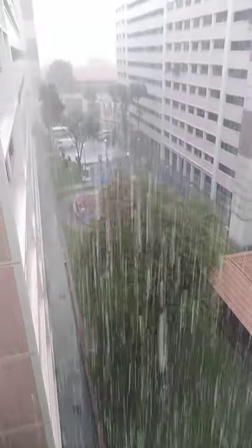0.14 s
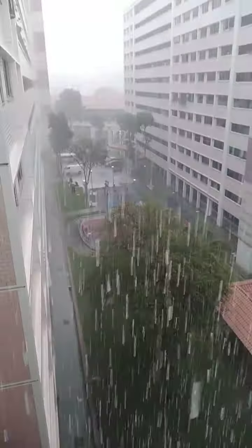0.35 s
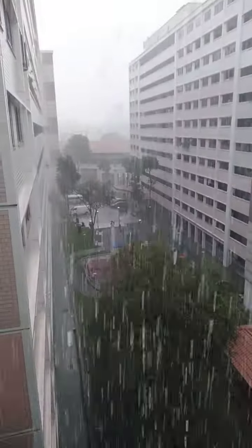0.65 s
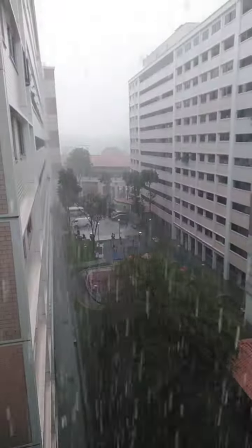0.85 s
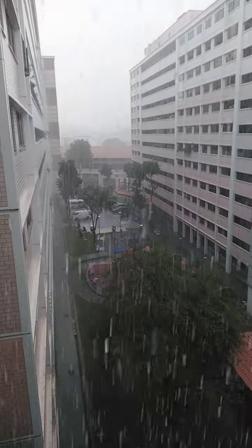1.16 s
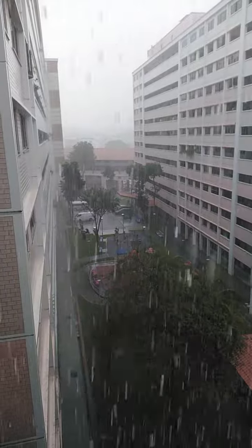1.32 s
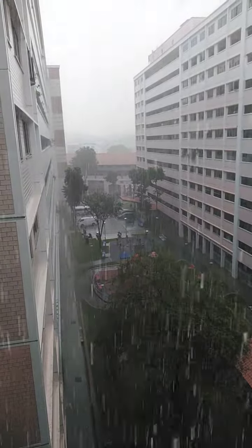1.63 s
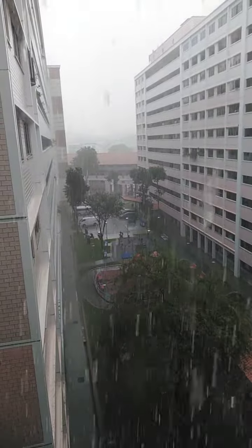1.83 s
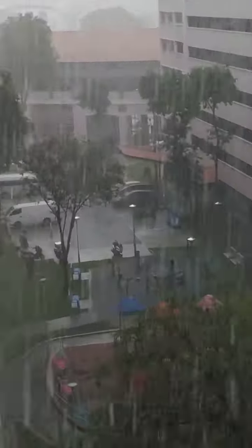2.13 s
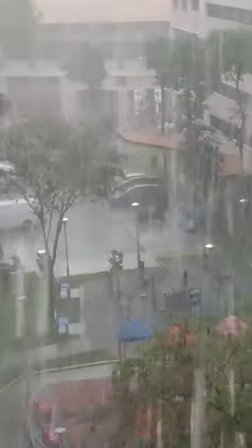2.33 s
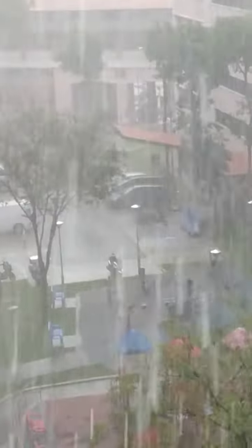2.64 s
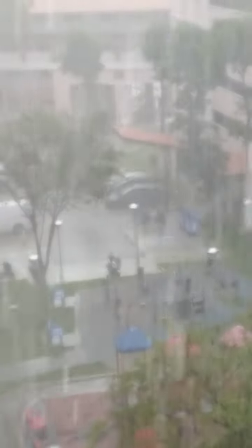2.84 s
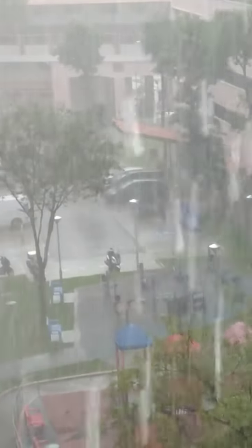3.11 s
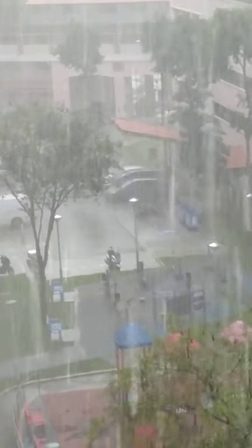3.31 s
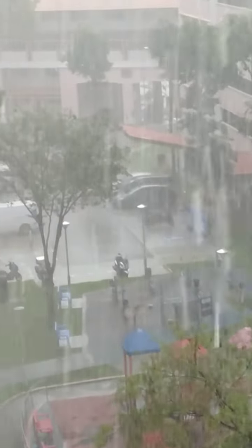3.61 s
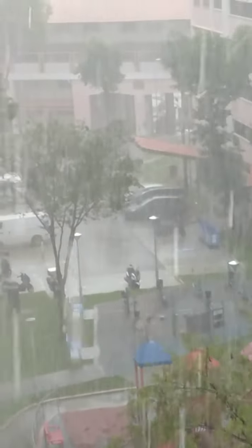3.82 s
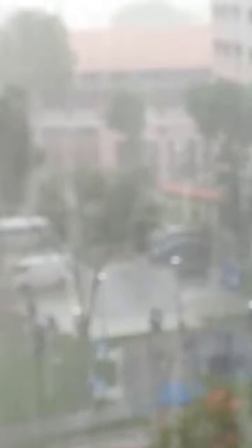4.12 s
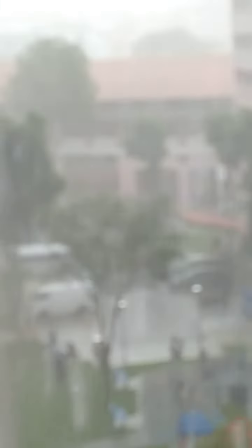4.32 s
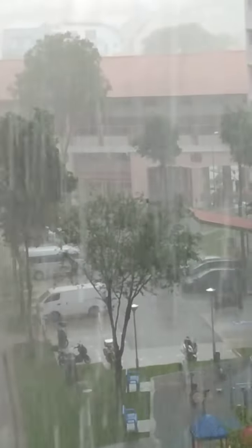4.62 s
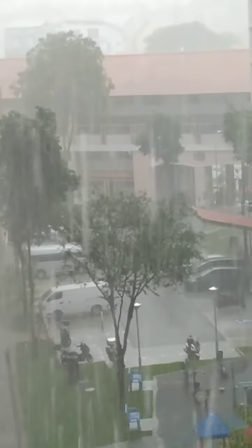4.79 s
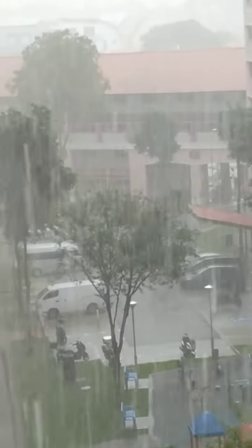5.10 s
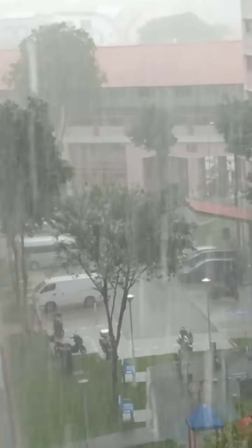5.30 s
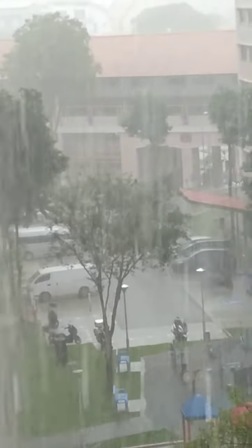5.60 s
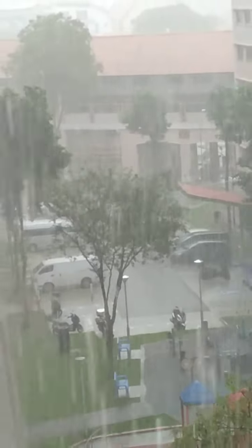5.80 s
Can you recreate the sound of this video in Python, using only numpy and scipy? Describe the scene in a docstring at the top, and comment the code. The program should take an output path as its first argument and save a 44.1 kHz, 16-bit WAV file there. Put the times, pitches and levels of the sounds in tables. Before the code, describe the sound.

A steady, sizzling downpour with close drop splashes and dull pops, increasingly buffeted by lumpy low wind rumble that overloads the microphone.

```python
"""Heavy rain heard from a high window through two small microphone ports, its hiss strongest near 7-8 kHz.
From the start drop ticks make the hiss and ring the wet ledge, and a faint 2.7 kHz whistle of resonant noise
soon dies away. Big drops splash nearby as short noise bursts, joined after a second by dull pops at the left.
All the while a rising wind buffets each port on its own as lumpy low noise with a brighter flutter.
A quick gain control ducks the rain under strong buffets, and the loudest peaks clip."""
import sys
import numpy as np
from scipy import signal
from scipy.fft import rfft, irfft
from scipy.io import wavfile
from scipy.ndimage import uniform_filter1d

SR = 44100
rng = np.random.default_rng(int(sys.argv[2]) if len(sys.argv) > 2 else 0)


def dump(signal):
    """Clip the signal to [-1, 1] and save it as 16-bit WAV at the path in sys.argv[1]."""
    limited = np.clip(np.atleast_2d(signal).T, -1, 1)
    pcm = np.round(limited * 32767).astype(np.int16)
    wavfile.write(sys.argv[1], SR, pcm)


N = 262395
T = np.arange(N) / SR
LAG = 19  # samples by which sound from below reaches the left port later
HALF_LEAN = np.array([[0.5], [-0.5]])  # shares a left-over-right difference in dB between the ports


def gain_of(db):
    """dB to a factor."""
    return 10 ** (np.asarray(db) / 20)


def evened(x):
    """Each channel at rms 1."""
    return x / np.sqrt(np.mean(x ** 2, -1, keepdims=True))


def curves(rows):
    """Columns of a time table, one value a sample."""
    s, *columns = np.transpose(rows)
    return np.array([np.interp(T, s, c) for c in columns])


def over_hz(rows):
    """Columns of a spectrum table, one value a frequency bin, read along log frequency."""
    hz, *columns = np.transpose(rows)
    bins = np.log(np.fft.rfftfreq(N, 1 / SR) + 1)
    return np.array([np.interp(bins, np.log(hz), c) for c in columns])


def coloured(x, rows):
    """Each channel through its own spectrum, at rms 1."""
    return evened(irfft(rfft(x) * gain_of(over_hz(rows)), N))


def wander(hz, channels):
    """Smooth chance motion at rms 1, between hz / 4 and hz."""
    slow = signal.butter(2, [hz / 4, hz], "bandpass", fs=SR, output="sos")
    return evened(signal.sosfilt(slow, rng.standard_normal((channels, N))))


def patter(per_s, spread_db, wash):
    """Drop ticks of uneven size over the smooth wash of far rain; the shared part reaches the left port later."""
    # How alike the rain is at the two ports. Each row: frequency in Hz, likeness from 0 to 1.
    likeness = [(300, 0.36), (1000, 0), (2200, 0.29), (3000, 0), (4000, 0.047), (8000, 0.039)]
    falls = rng.random((2, N)) < per_s / SR
    size = gain_of(spread_db * np.minimum(rng.exponential(1, (2, N)), 5))
    ticks = evened(size * falls * rng.choice([-1., 1.], (2, N)))
    right, other = evened(ticks + wash * rng.standard_normal((2, N)))
    same = np.clip(over_hz(likeness)[0], 0, 1)
    shared = same * rfft(np.roll(right, LAG))
    left = shared + np.sqrt(1 - same ** 2) * rfft(other)
    return np.array([irfft(left, N), right])


def patchy(x):
    """The hiss thins out unevenly in small random patches of time and pitch."""
    # Unevenness of the hiss. Each row: frequency in Hz, depth of the patches in dB.
    depths = [(800, 3), (2200, 4.5), (3500, 15), (4800, 7), (7500, 1.5), (10000, 4.5), (12000, 10.5)]
    hz, _, z = signal.stft(x, SR, nperseg=1024, noverlap=768)
    patches = uniform_filter1d(rng.standard_normal(z.shape[1:]), size=2, axis=0)
    patches = uniform_filter1d(patches, size=7, axis=1)
    # patches thin the hiss more than they swell it
    patches = np.minimum(patches / patches.std(), 0.6)
    depth_db = np.interp(hz, *np.transpose(depths))[:, None]
    _, uneven = signal.istft(z * gain_of(depth_db * patches), nperseg=1024, noverlap=768)
    return evened(uneven[:, :N])


def ledge_ring(level_db):
    """Drops on the wet ledge ring it in a few broad modes, at a level that wanders."""
    # Modes of the ledge. Each row: centre in Hz, width at half amplitude in Hz,
    # left and right peak in dB relative to each other.
    ledge = [(926, 1700, -12, -8.5), (2230, 460, -6, -12)]
    hz = np.fft.rfftfreq(N, 1 / SR)
    modes = sum(gain_of([[left_db], [right_db]]) / (1 + 2j * (hz - centre) / width) ** 2
                for centre, width, left_db, right_db in ledge)
    ring = irfft(rfft(patter(per_s=900., spread_db=2.2, wash=0.26)) * modes, N)
    return ring / ring[0].std() * gain_of(level_db + 3.9 * wander(7.6, channels=1))


def rain():
    """The downpour: a patchy hiss of many drops coloured by the ports, and the ring of the ledge."""
    # Course of the downpour. Each row: time in seconds, mean level of the ledge ring at the left port in dB,
    # hiss left over right in dB.
    downpour = [(0, -34.5, 1), (1, -37.5, 3), (2.2, -41, 3.5), (3, -41, 4), (4.5, -34, 4), (5.95, -39, 4)]
    # Colour of the hiss through each port, with the port resonance on top.
    # Each row: frequency in Hz, left and right density in relative dB per Hz.
    hiss_colour = [(200, -29, -22), (686, -10.5, -7), (980, -17.5, -15), (1670, -14, -14.5),
                   (2370, -12, -9), (2670, -14, -10), (3120, -16.5, -12.5), (3670, -17, -14),
                   (4160, -11.5, -9), (6080, -6, -1.5), (6540, -3.5, 1), (7170, -1, 7), (7600, 3, 1),
                   (8350, 2.5, 0), (9090, -2, -6), (10570, -13, -8), (11150, -16, -13.5),
                   (14000, -20.5, -20.5)]
    ring_db, lean_db = curves(downpour)
    drops = patter(per_s=3500., spread_db=4.1, wash=1.3)
    hiss = coloured(patchy(drops), hiss_colour) * gain_of(-9 + HALF_LEAN * lean_db)
    return hiss + ledge_ring(ring_db)


def puffs():
    """Strength in dB of the single buffets at each port: a smooth bump for each."""
    # Single buffets, weak and strong, at set times. Each row: time in seconds, port (0 left, 1 right),
    # strength in dB before the wind scales it.
    set_puffs = [(0.126, 0, 5), (0.193, 1, 27), (0.432, 0, 17), (0.522, 1, 12), (0.574, 0, 19),
                 (0.645, 1, 20), (0.816, 0, 20), (0.926, 0, 28), (0.995, 0, 19), (1.021, 1, 17),
                 (1.085, 1, 21), (1.126, 0, 14), (1.141, 1, 19), (1.213, 1, 14), (1.22, 0, 14),
                 (1.311, 1, 16), (1.403, 1, 13), (1.517, 1, 7), (1.531, 0, 12), (1.599, 1, 10),
                 (1.62, 0, 9), (1.725, 1, 2), (1.796, 1, 22), (1.854, 1, 13), (1.91, 1, 7), (1.915, 0, 10),
                 (1.971, 1, 6), (2.07, 1, 17), (2.174, 1, 24), (2.255, 1, 9), (2.293, 1, 24),
                 (2.331, 0, 18), (2.342, 1, 23), (2.382, 0, 11), (2.475, 1, 12), (2.529, 1, 5),
                 (2.616, 1, 15), (2.652, 1, 19), (2.689, 1, 15), (2.726, 1, 21), (2.807, 1, 16),
                 (2.872, 1, 15), (2.945, 1, 10), (2.961, 0, 24), (3., 1, 6), (3.019, 0, 5), (3.06, 0, 11),
                 (3.105, 1, 27), (3.128, 0, 15), (3.298, 1, 11), (3.36, 0, 14), (3.394, 1, 5),
                 (3.439, 0, 11), (3.5, 1, 6), (3.58, 1, 18), (3.654, 1, 18), (3.71, 1, 7), (3.73, 0, 5),
                 (3.762, 1, 19), (3.797, 1, 15), (3.87, 1, 13), (3.962, 0, 8), (4.02, 1, 12),
                 (4.044, 1, 11), (4.244, 1, 12), (4.264, 0, 2), (4.324, 1, 9), (4.426, 0, 2),
                 (4.498, 1, 12), (4.67, 1, 14), (4.737, 1, 7), (4.807, 1, 21), (4.842, 0, 1), (4.86, 1, 18),
                 (4.9, 1, 18), (4.987, 1, 13), (5.1, 1, 16), (5.141, 1, 20), (5.22, 0, 5), (5.37, 1, 5),
                 (5.392, 0, 5), (5.428, 1, 8), (5.473, 1, 15), (5.481, 0, 4), (5.504, 1, 21),
                 (5.559, 1, 10)]
    puff_s = 0.0069  # time from the top of a bump down to 1/e
    per_s = np.array([[2.8], [1.7]])  # further buffets that come by chance: left, right
    peak_db = rng.uniform(5.64, 14.4, (2, N)) * (rng.random((2, N)) < per_s / SR)
    for s, port, db in set_puffs:
        peak_db[round(port), round(s * SR)] += db
    bump = np.exp(-(np.arange(-2600, 2601) / SR / puff_s) ** 2)
    return signal.oaconvolve(peak_db, bump[None], "same")


def wind():
    """Lumpy pressure, unrelated at the two ports; stronger gusts shed more small eddies and sound brighter."""
    # Wind level at each port. Each row: time in seconds, left level in dB, right level in dB.
    gusts = [(0, -19, -17.5), (.4, -14, -17), (.75, -15.5, -12), (1, -13.5, -13), (1.15, -9.5, -12),
             (1.4, -9.5, -16.5), (1.62, -10.5, -12), (1.87, -9, -7), (2.1, -7.5, -9), (2.3, -8.5, -10),
             (2.75, -7.5, -5.5), (3.1, -6.5, -4), (3.6, -6, -7), (4.1, -6, -4.5), (4.6, -5.5, -6.5),
             (5.1, -5.5, -5), (5.5, -5.5, -6), (5.95, -3.5, -5)]
    # Colour of the slow buffeting. Each row: frequency in Hz, left and right density in relative dB per Hz.
    buffet_colour = [(20, -40, -32), (30, -38, -33), (45, -18, -19.5), (71, -5, -4.5), (109, -1, 1),
                     (186, -0.5, -4), (261, -3, -5.5), (400, -13.5, -24.5), (590, -51, -54)]
    # Colour of the flutter of small eddies, with the same columns: Hz, left and right in relative dB per Hz.
    flutter_colour = [(100, -21, -26), (297, -2, 2.5), (396, -3.5, -3), (598, -7.5, -12), (735, -11, -19.5),
                      (923, -21.5, -25), (1330, -30, -30), (2500, -52, -48)]
    eddy_growth = 2.06  # dB of flutter for each dB of wind
    eddy_db = [[1], [-0.5]]  # flutter at a wind of 0 dB: left, right
    eddy_top_db = 15  # no burst of flutter rises further

    gust_db, lumps, puff_db = curves(gusts), wander(38.0, channels=2), puffs()
    buffet_db = 2.2 * lumps + 0.65 * puff_db
    buffet = coloured(rng.standard_normal((2, N)) * gain_of(buffet_db), buffet_colour)
    flicker_db = [[4.], [5.]] * wander(113.0, channels=2)
    eddies = 2.5 * lumps + 1.44 * puff_db + flicker_db
    eddies = eddy_top_db * np.tanh(eddies / eddy_top_db)
    flutter = coloured(rng.standard_normal((2, N)) * gain_of(eddies), flutter_colour)
    return gain_of(gust_db) * buffet + gain_of(eddy_growth * gust_db + eddy_db) * flutter


def add_burst(out, s, db, band_hz, length, lean_db):
    """Add band-limited noise with a quick rise and a slower fall, partly shared by the ports."""
    left, right, both = rng.standard_normal((3, 4000))
    spray = [left + 6.5 * np.roll(both, LAG), right + 0.93 * both]
    band = signal.butter(2, band_hz, "bandpass", fs=SR, output="sos")
    u = T[:4000] / length
    swell = np.sqrt(u) * np.exp((1 - u) / 2 - u)
    burst = evened(signal.sosfilt(band, spray)) * swell
    part = out[:, round(s * SR):][:, :4000]
    part += (gain_of(db + HALF_LEAN * lean_db) * burst)[:, :part.shape[1]]


def splashes():
    """Big drops bursting on the ledge: each a short burst of spray, not quite an octave wide."""
    # Each row: start in seconds, level in dB before envelope and lean, centre in Hz, time scale in seconds.
    big_drops = [(0.085, -17, 2680, 0.025), (0.567, -18, 2630, 0.0091), (0.734, -17.5, 1150, 0.026),
                 (.903, -21, 2650, 0.0056), (1.025, -13.5, 1920, 0.0063), (1.346, -14, 2600, 0.005),
                 (1.56, -11, 3300, 0.006), (1.905, -15.5, 2070, 0.011), (2.056, -21, 2120, 0.016),
                 (2.241, -17, 2600, 0.0097), (2.756, -17, 2600, .004), (2.77, -14, 2720, 0.0054),
                 (2.901, -16, 2290, 0.008), (3.201, -15, 2600, 0.0043), (4.165, -14, 2600, 0.0073),
                 (4.333, -21, 2650, .01), (4.388, -12, 2260, 0.0071), (4.956, -14.5, 2300, 0.021),
                 (5.061, -19, 2060, 0.013), (5.269, -16, 1900, 0.004), (5.386, -15, 3040, 0.0056),
                 (5.59, -13, 1080, 0.041)]
    out = np.zeros((2, N))
    for s, db, hz, length in big_drops:
        add_burst(out, s, db, [hz / 1.52, hz * 1.21], length, lean_db=6)
    return out


def pops():
    """Short dull pops close to the left port: lower and broader bursts of noise."""
    # Each row: start in seconds, level in dB before envelope and lean.
    dull_pops = [(1.367, -14), (2.794, -9), (2.853, -11), (3.351, -11), (3.534, -12), (3.957, -9),
                 (4.853, -7), (5.156, -15), (5.244, -7), (5.386, -10), (5.704, -15), (5.768, -7)]
    hz = 885
    out = np.zeros((2, N))
    for s, db in dull_pops:
        add_burst(out, s, db, [hz / 2.6, hz * 1.27], length=0.0021, lean_db=13.5)
    return out


def whistle():
    """Hiss in a narrow resonance whose pitch wanders, almost only at the left port."""
    # The whistle dying away. Each row: time in seconds, mean level at the left port in dB.
    fade = [(0, -22), (.3, -28.5), (.6, -28.5), (1, -29), (1.4, -39), (2, -50)]
    centre_hz, width_hz, waver = 2690, 150, 0.02  # waver: rms share of the pitch
    pitch_hz = centre_hz * (1 + waver * wander(12.5, channels=1)[0])
    turn = np.exp(2j * np.pi * np.cumsum(pitch_hz) / SR)
    # shift the noise down by the pitch, keep a narrow band, shift it back
    r = np.exp(-np.pi * width_hz / SR)
    narrow = signal.lfilter([1], np.convolve([1, -r], [1, -r]), rng.standard_normal(N) / turn)
    tone = (turn * narrow).real
    right_drop_db = np.array([[0], [33]])
    level_db = curves(fade) + 2.8 * wander(11.0, channels=1) - right_drop_db
    return evened(tone) * gain_of(level_db)


def scene():
    """Rain, wind, splashes, pops and the whistle at the two ports."""
    return rain() + wind() + splashes() + pops() + whistle()


def record(dry):
    """One gain control for both channels, a quick stage for peaks and a slow one for loudness; overload; band limit."""
    threshold_db, fall_db_per_s = -7.0, 160  # of the held peak level, which the gain follows in part
    edge_hz = 14220
    power_db = 10 * np.log10(uniform_filter1d((dry ** 2).max(0), 130) + 1e-9)
    fall = T * fall_db_per_s
    held_db = np.maximum.accumulate(power_db + fall) - fall
    over_db = np.maximum(held_db - threshold_db, 0)
    # loudness over half a second, relative to -9.9 dB
    slow_db = 10 * np.log10(uniform_filter1d((dry ** 2).mean(0), size=SR // 2)) + 9.9
    ducked = dry / gain_of(0.44 * uniform_filter1d(over_db, 110) + 0.15 * slow_db)
    clipped = np.clip(1.335 * np.tanh(ducked / 1.267), -1, 1)
    low_pass = signal.firwin(1023, edge_hz, window=("kaiser", 9), fs=SR)
    return signal.oaconvolve(clipped, low_pass[None], "same")


dry = scene()
out = record(dry)
dump(out)
```